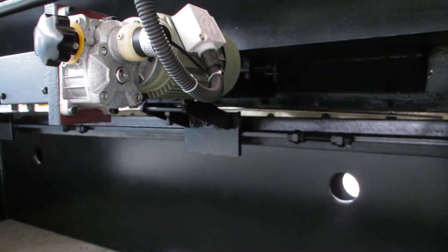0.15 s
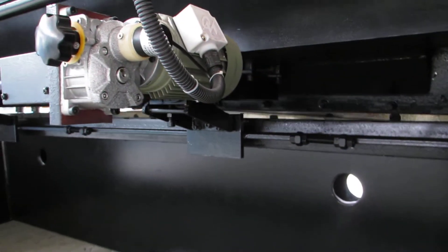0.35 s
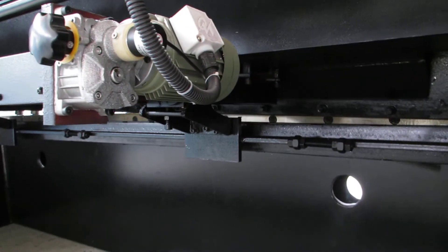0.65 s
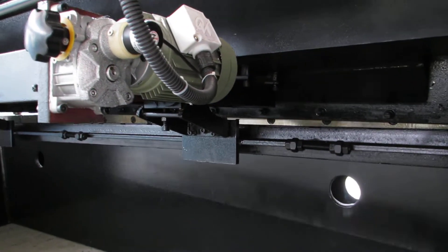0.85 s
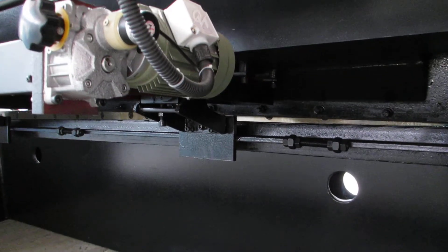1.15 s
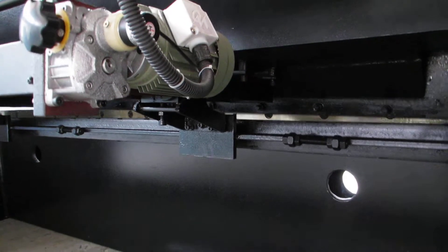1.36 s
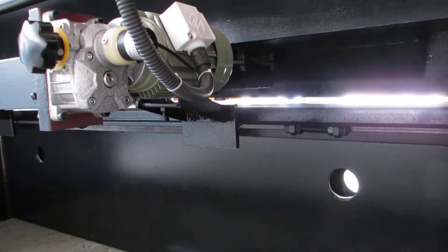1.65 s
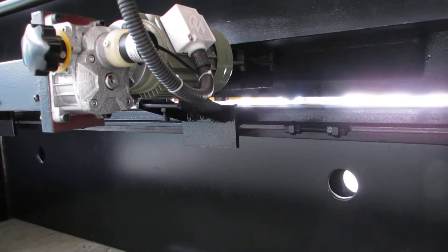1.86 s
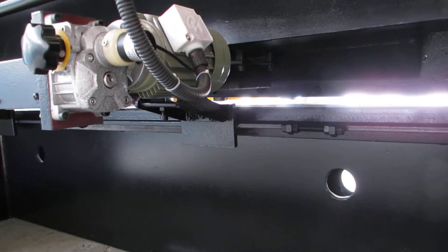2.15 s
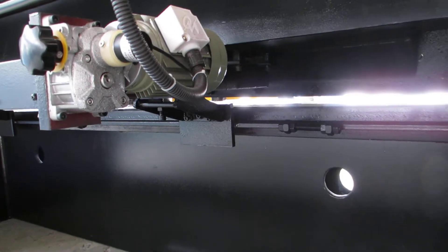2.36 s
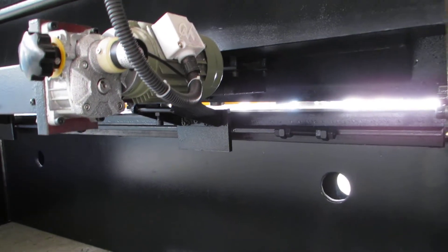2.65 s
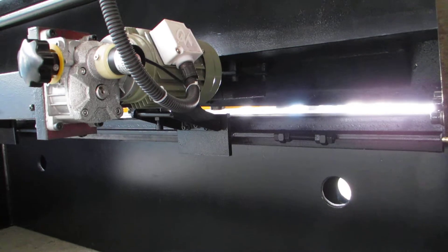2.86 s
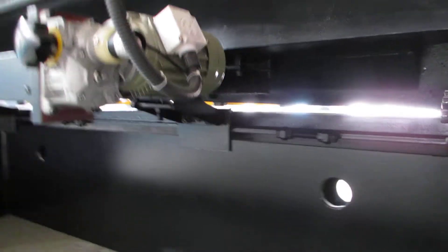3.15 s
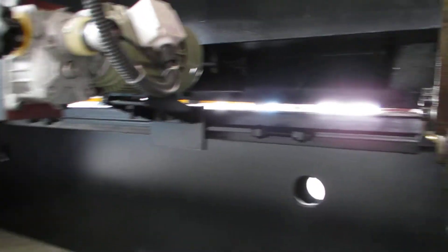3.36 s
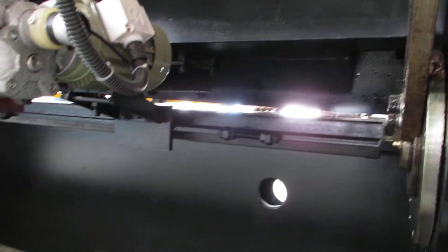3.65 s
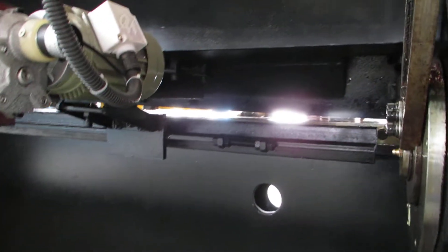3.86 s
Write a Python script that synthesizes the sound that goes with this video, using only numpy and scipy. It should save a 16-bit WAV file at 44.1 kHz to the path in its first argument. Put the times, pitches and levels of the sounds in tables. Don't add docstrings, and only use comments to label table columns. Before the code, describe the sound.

A hydraulic shear whines, rumbles and clatters, stops with dull knocks, then a cut steel strip slaps the floor, bounces and rattles brightly before falling still; motor hum remains. Close stereo microphone in a workshop.

```python
import sys
import numpy as np
from scipy import signal
from scipy.io import wavfile
from scipy.ndimage import uniform_filter1d

SR = 44100
rng = np.random.default_rng(int(sys.argv[2]) if len(sys.argv) > 2 else 0)


def volts_from_db(level):
    exponent = np.asarray(level, float) / 20
    return 10 ** exponent


def wav_out(sig):
    wavfile.write(sys.argv[1], SR, np.round(np.clip(np.atleast_2d(sig).T, -1, 1) * 32767).astype(np.int16))


N = 176400
T = np.arange(N) / SR

# start_s, level_db, rattle_t60_s, brightness_db_per_octave
BOUNCES = [(1.019, -7.5, 0.37, -1), (1.0336, -10.5, 0.11, 21.5), (1.091, -3.5, 0.077, 9),
           (1.1094, -26.5, 0.54, -11), (1.159, -14.5, 0.19, 0.5), (1.202, -13, 0.17, 7),
           (1.239, -5.5, 0.05, 12.5), (1.249, -9.5, 0.093, 10), (1.269, -8.5, 0.25, 10.5),
           (1.3073, -7.5, 0.051, -6), (1.321, -12.5, 0.067, -7.5), (1.35, -10.5, 0.12, -5.5),
           (1.375, -21, 0.33, -10), (1.481, -16, 0.089, -4), (1.497, -11.5, 0.116, 2),
           (1.511, -17.5, 0.22, -4.5), (1.582, -16, 0.19, 9.5), (1.5917, -14.5, 0.16, -3.5),
           (1.6286, -26, 0.51, -8.5)]
# pitch_hz, level_db
STRIP_TONE = [(410, -38.5), (700, -3.5), (1040, -8.5), (2400, -8.5), (5520, -2), (6270, -1.5),
              (11200, -13.5), (13900, -33), (15000, -41)]
CROSS_HZ = [1990, 2280, 2720, 3050, 3400, 6360, 6740, 6928, 7400, 7840, 8142, 8457, 8810, 9084, 10600,
            10770, 12800, 13400, 13820, 14250, 14700]
# start_s, level_db, t60_s
CLATTER_HITS = [(0.073, -21, 0.11), (0.0885, -20, 0.083), (0.245, -22, 0.13), (0.2797, -20, 0.75),
                (0.318, -13, 0.16), (0.3566, -13, 0.19), (0.4825, -24, 0.99), (0.5656, -17, 0.21),
                (0.6085, -17, 0.21), (0.6397, -12.5, 0.55), (0.7086, -11.5, 0.13), (0.7307, -14, 0.26),
                (0.903, -25.5, 0.15)]
# pitch_hz, level_db
CLATTER_TONE = [(240, -42), (400, -13), (701, -7.5), (1040, -5), (3150, -18), (5680, -11.5), (9520, -18.5),
                (12500, -30), (15000, -25)]
# start_s, level_db, centre_hz
KNOCKS = [(.709, -8.5, 246), (.714, -4, 65.6), (.75, -10, 176), (.795, -12.5, 170.7), (.826, -13.5, 134),
          (.853, -16.5, 143.6), (1.258, -15.5, 72), (1.3, -15.5, 520), (1.33, -18, 548), (1.35, -20.5, 610),
          (1.372, -22, 450), (1.408, -20, 295), (1.6, -24, 258), (1.835, -27, 180)]
BODY_HZ = [62, 105, 140, 176, 238, 258, 320, 545, 624, 740, 894]
# start_s, level_db, pitch_hz, t60_s
PINGS = [(.05, -21, 1420, 0.11), (.1, -24, 1304, 0.095), (.24, -26, 4610, .004), (.33, -30, 1737, .15),
         (.345, -29.5, 2400, 0.13), (.355, -28, 5790, .015), (.61, -30, 4350, 0.045), (.64, -27, 5770, .05),
         (.7, -21, 4500, .01), (.775, -13, 138, 0.065), (0.903, -20, 2270, 0.0036),
         (1.02, -23, 1330, 0.013), (1.035, -29, 1102, .15), (1.24, -27.5, 3640, 0.13),
         (1.295, -17, 243, .15), (1.315, -17, 3070, 0.0035), (1.39, -34, 3730, 0.17),
         (1.395, -16.5, 257.5, 0.11), (1.451, -31, 177.6, 0.44), (1.49, -33, 2545, 0.22),
         (1.495, -26, 5800, 0.14), (1.5, -32, 5200, 0.22), (1.518, -25, 4640, 0.13),
         (1.61, -26, 4700, 0.11), (1.625, -30, 3814, 0.31), (1.625, -28, 5190, 0.22),
         (1.63, -29.5, 5470, 0.15)]
# time_s, level_db
LOAD = [
    (0, -18.5),
    (.3, -16),
    (.45, -20),
    (.7, -18.5),
    (.8, -24),
    (.87, -30),
    (.95, -23.5),
    (1.02, -32.5),
    (1.1, -45),
]
# pitch_hz, level_db
RUMBLE_TONE = [(18, -48.5), (30, -21), (240, -6.5), (485, -19.5), (629, -7.5), (794, -19.5), (6530, -39.5),
               (10400, -52.5), (15000, -91)]
# pitch_hz, width_hz, level_db
FRAME = [(107.4, 14, -10.5), (241, 30, -6), (290.5, 11, -10.5), (388.4, 5.5, -11.5), (666, 7.9, -17),
         (865.3, 16, -10.5)]
# time_s, level_db
PUMP_LEVEL = [
    (0, -15.5),
    (.3, -16),
    (.35, -19.5),
    (.6, -20.5),
    (.63, -28),
    (.65, -15),
    (.705, -18.5),
    (.73, -45),
    (.8, -60.5),
]
# shaft_multiple, level_db
ORDER_LEVELS = [(10, -46.5), (11, -45), (12, -49), (13, -43.5), (14, -51.5), (15, -46.5), (18, -47.5),
                (19, -49.5), (20, -47.5), (21, -57), (23, -53.5), (24, -55), (25, -48), (26, -54.5),
                (27, -49.5), (28, -54), (30, -53), (34, -57), (36, -56), (38, -53.5), (39, -49.5),
                (41, -58.5), (42, -57), (43, -58.5), (44, -50.5), (45, -53.5), (47, -73.5), (49, -67),
                (52, -56), (58, -57)]
# time_s, gain_db
GAIN = [
    (0, 8.5),
    (1.0, 3.5),
    (1.05, -14),
    (1.3, 2),
    (1.75, -3),
    (2.4, -2.5),
    (3.2, 0.5),
    (4.0, 4),
]
# pitch_hz, level_db
HALL_TONE = [(18, -45), (30, -13.5), (200, -1), (320, -12), (415, -7.5), (472, -4), (1090, -4), (7240, -32),
             (15000, -56.5)]
# pitch_hz, likeness_0_to_1
SAME = [(60, 0.98), (240, 1), (940, 0.95), (3710, 0.8), (8000, 0.84), (14700, 0.25)]


def evened(x):
    return x / np.sqrt(np.mean(x ** 2) + 1e-20)


def read(points, hz):
    f, value = np.transpose(points)
    return np.interp(np.log(hz + 1), np.log(f + 1), value)


def curve(rows):
    time_s, value = np.transpose(rows)
    return np.interp(T, time_s, value)


def noise(tone, patchy_db):
    hz = np.fft.rfftfreq(1024, 1 / SR)
    a, b, c, d, patch = rng.standard_normal((N // 256 + 5, 513, 5)).T
    patch = uniform_filter1d(patch, size=8, axis=0)
    patch = evened(uniform_filter1d(patch, size=10, axis=1))
    same = np.clip(read(SAME, hz), 0, 1)[:, None]
    left = a + 1j * b
    right = same * left + np.sqrt(1 - same ** 2) * (c + 1j * d)
    z = np.array([left, right]) * volts_from_db(read(tone, hz)[:, None] + patchy_db * patch)
    return evened(signal.istft(z, nperseg=1024, noverlap=768)[1][:, :N])


def ring(x, hz, width):
    r = np.exp(-np.pi * width / SR)
    w = 2 * np.pi * hz / SR
    return signal.lfilter([0, np.sin(w)], [1, -2 * r * np.cos(w), r * r], x)


def burst(s, t60, rise_s):
    t = np.maximum(T - s, 0)
    return np.minimum(t / rise_s, 1) * volts_from_db(-60 * t / max(t60, .005))


def settle():
    flat_s, choke_db_per_s = 1.72, 172
    return volts_from_db(-choke_db_per_s * np.maximum(T - flat_s, 0))


def strip_ringing(slope_db):
    ring_s, uneven_db, pair_split = 0.27, 6, 0.0073
    j = np.arange(-6, 23)
    bend = 5195 + 285 * j + 3.7 * j ** 2 - .06 * j ** 3
    twin = bend * (1 + pair_split * rng.standard_normal(len(j)))
    cross = np.array(CROSS_HZ)
    hz = np.concatenate([bend, twin, cross])
    bend_db = -9.0 * (bend < 4800)
    twin_db = -5 - 4.8 * (twin < 4800)
    cross_db = 1.5 - 8.4 * (cross < 4800) + 9 * (cross > 13000)
    extra_db = np.concatenate([bend_db, twin_db, cross_db])

    near = slice(SR, 2 * SR)
    shakes = np.array([(volts_from_db(db) * burst(s, t60, rise_s=0.0012))[near] for s, db, t60, _ in BOUNCES])
    tilt = np.outer(slope_db, np.log2(hz / 6000))
    luck = rng.standard_normal(tilt.shape).clip(-2, 1.4)
    share = volts_from_db(uneven_db * luck + tilt + extra_db + read(STRIP_TONE, hz))
    white = noise([(20, 0.0055), (20000, 0.0039)], patchy_db=-0.3)[:, near]
    grit = white * volts_from_db(2.85 * rng.exponential(1, white.shape[1]).clip(0, 4) - 39)
    out = np.zeros((2, N))
    for k, f in enumerate(hz):
        width = 2.87 / ring_s * (f / 5000) ** .5
        out[:, near] += volts_from_db(-11.5) * ring(grit * (share[:, k] @ shakes), f, width)
    return out


def strip_crash(slope_db):
    power = np.array([(volts_from_db(db) * burst(s, 1.63 * t60, rise_s=0.00154)) ** 2 for s, db, t60, _ in BOUNCES])
    crash = noise(STRIP_TONE, patchy_db=2.5)
    crash = crash * volts_from_db(1.1 * evened(uniform_filter1d(rng.standard_normal(N), size=200)))
    low = signal.sosfilt(signal.butter(4, 5000, fs=SR, output="sos"), crash)
    high = signal.sosfilt(signal.butter(4, 4600, "high", fs=SR, output="sos"), crash)
    low = low * np.sqrt(volts_from_db(-2.2 * slope_db) @ power)
    high = high * np.sqrt(volts_from_db(0.23 * slope_db) @ power)
    return volts_from_db(-13.5) * (low + high)


def strip():
    slope_db = np.array([row[3] for row in BOUNCES])
    bouncing = (strip_ringing(slope_db) + strip_crash(slope_db)) * settle()
    slap_tone = [(500, -15.5), (900, 0.0), (1400, 2), (2400, -3.5), (5000, -10.0)]
    slap = noise(slap_tone, patchy_db=-5.5) * burst(BOUNCES[0][0], 0.063, rise_s=0.0013)
    return bouncing + volts_from_db(-8) * slap


def clatter():
    power = np.zeros(N)
    for s, db, t60 in CLATTER_HITS:
        rattle = burst(s, t60, rise_s=0.0058) ** 2
        click = volts_from_db(db + 22) * burst(s, 0.028, rise_s=0.00075) ** 2
        power += volts_from_db(db) ** 2 * (rattle + click)
    return volts_from_db(-6.0) * np.sqrt(power) * noise(CLATTER_TONE, patchy_db=0.5)


def knocks():
    reach_octaves, body_s = 0.78, 0.35
    out = np.zeros(N)
    luck = rng.standard_normal((len(KNOCKS), len(BODY_HZ)))
    for k, hz in enumerate(BODY_HZ):
        drive = np.zeros(N)
        for (s, db, centre_hz), row in zip(KNOCKS, luck):
            nearness = np.exp(-(np.log2(hz / centre_hz) / reach_octaves) ** 2)
            drive[round(s * SR)] = -volts_from_db(db + 2.0 * row[k]) * nearness
        out += volts_from_db(-10.5) * ring(drive, hz, 1.62 / body_s * max(hz / 200, 1) ** 0.76)
    power = np.zeros(N)
    for s, db, centre_hz in KNOCKS:
        power += (centre_hz / 400 * volts_from_db(db) * burst(s, .22, rise_s=0.0025)) ** 2
    thud_tone = [(60, -8.5), (230, -1.5), (600, -3), (4000, -20), (12000, -52.0)]
    return out + volts_from_db(-2) * np.sqrt(power) * noise(thud_tone, patchy_db=4.0)


def pings():
    out = np.zeros(N)
    choke = settle()
    for s, db, hz, t60 in PINGS:
        scrape = rng.standard_normal(N) * burst(s, 0.18, rise_s=0.013)
        rung = ring(scrape, hz, 1.15 / max(t60, .002))
        rung = volts_from_db(db) * rung / abs(rung).max()
        out += rung if hz < 1000 else rung * choke
    return out


def stroke():
    out = noise(RUMBLE_TONE, patchy_db=2.0)
    white = noise([(20, 0), (20000, 0)], patchy_db=1.2)
    for hz, width, db in FRAME:
        out = out + volts_from_db(db) * evened(ring(white, hz, width))
    return out * volts_from_db(curve(LOAD) - 1.0)


def pump():
    whine_hz, waver_db, fuzz_db = 637.6, .8, -12
    sway = evened(uniform_filter1d(rng.standard_normal(N), size=900))
    tone = np.sqrt(2) * np.sin(2 * np.pi * whine_hz * T) * volts_from_db(waver_db * sway)
    fuzz = evened(ring(rng.standard_normal(N), whine_hz, 93))
    return (tone + volts_from_db(fuzz_db) * fuzz) * volts_from_db(curve(PUMP_LEVEL))


def tick():
    hiss = noise([(4000, -30), (9000, 2), (14000, 2)], patchy_db=3)
    return volts_from_db(-46.5) * burst(2.86, 0.019, rise_s=0.00037) * hiss


def idle():
    shaft_hz = 24.908
    out = volts_from_db(-38) * noise(HALL_TONE, patchy_db=0.5)
    for order, db in ORDER_LEVELS:
        sway = np.interp(T, np.linspace(0, 4, 30), rng.standard_normal(30))
        turns = round(order) * shaft_hz * T + rng.random()
        hum = np.sin(2 * np.pi * turns + 0.1 * sway[::-1])
        out += np.sqrt(2) * volts_from_db(db + 0.72 * sway) * hum
    return out * volts_from_db(curve(GAIN))


def hall(x):
    t = T[:SR]
    dull = signal.lfilter([1], [1, -.55], rng.standard_normal((2, SR)))
    tail = dull * volts_from_db(-60 * t / 1.5) * (t > .015)
    return signal.fftconvolve(x, tail / np.linalg.norm(tail[0]), axes=1)[:, :N]


def scene():
    hits = clatter() + strip() + knocks() + pings()
    return hits + volts_from_db(-23.5) * hall(hits) + idle() + pump() + stroke() + tick()


def masked(x):
    from_hz, weak_db, share_db = 10800, -27, -11
    hz, _, z = signal.stft(x, SR, nperseg=2048, noverlap=1024)
    size = abs(z).max(axis=0)
    treble = size[(hz > 4500) & (hz < 9500)] ** 2
    bass = size[hz < 1500] ** 2
    total = treble.sum(axis=0)
    strained = total > volts_from_db(2 * share_db) * bass.sum(axis=0)
    strained[1:] &= total[1:] < 3.5 * total[:-1]
    weak = size < volts_from_db(weak_db) * np.sqrt(treble.mean(axis=0))
    weak = weak & strained & (hz > from_hz)[:, None]
    return signal.istft(z * ~weak, SR, nperseg=2048, noverlap=1024)[1][:, :N]


def band_limit(x):
    return signal.sosfilt(signal.butter(12, 15270, fs=SR, output="sos"), x)


def record(dry):
    x = 0.87 * np.tanh(dry / 0.93) * volts_from_db(np.array([[-.2], [.2]]))
    x = signal.sosfilt(signal.butter(4, 53, "high", fs=SR, output="sos"), x)
    x = signal.sosfilt(signal.butter(6, 11550, fs=SR, output="sos"), x)
    mix = masked(x)
    return band_limit(mix)


dry = scene()
out = record(dry)
wav_out(out)
```